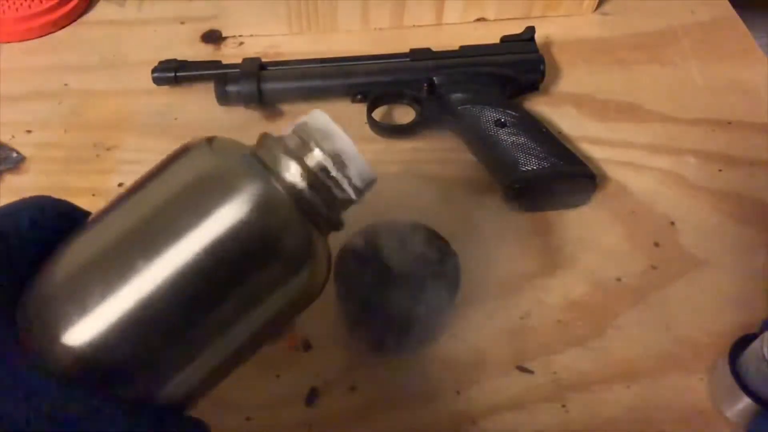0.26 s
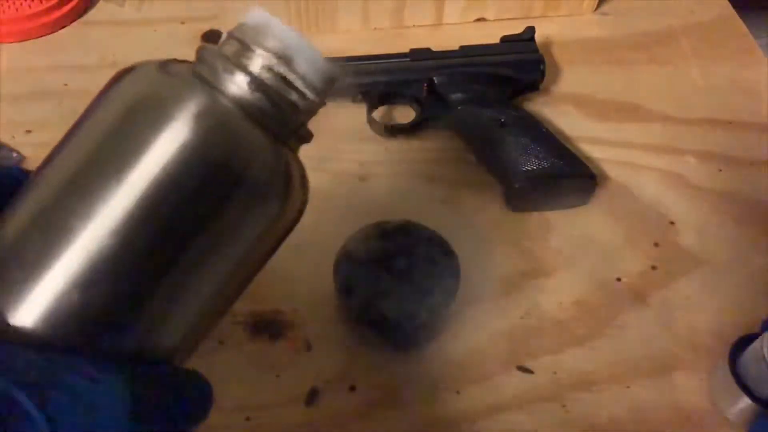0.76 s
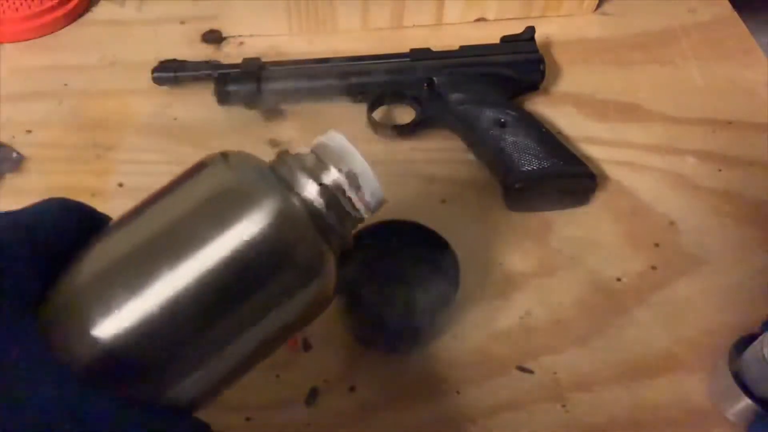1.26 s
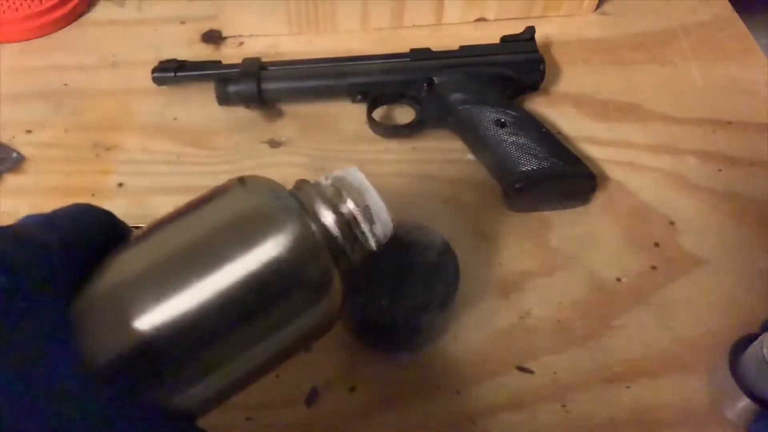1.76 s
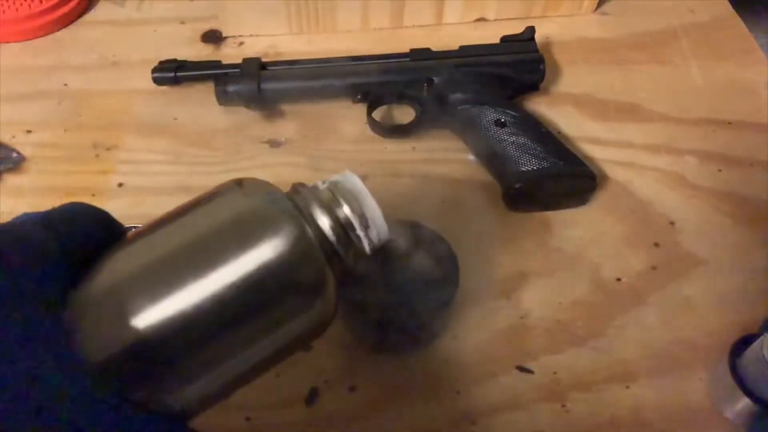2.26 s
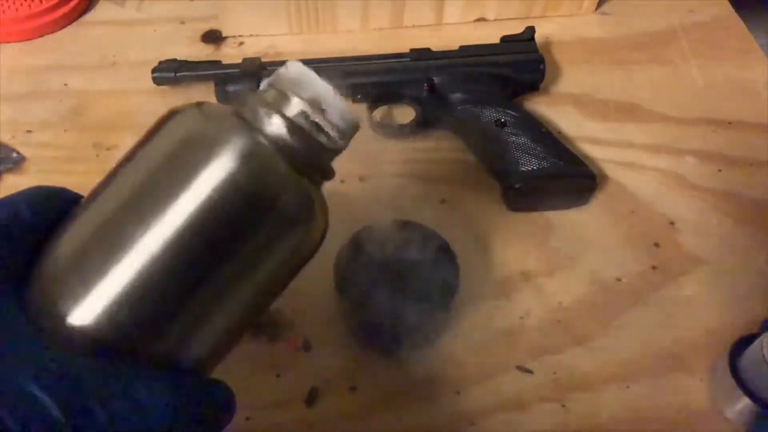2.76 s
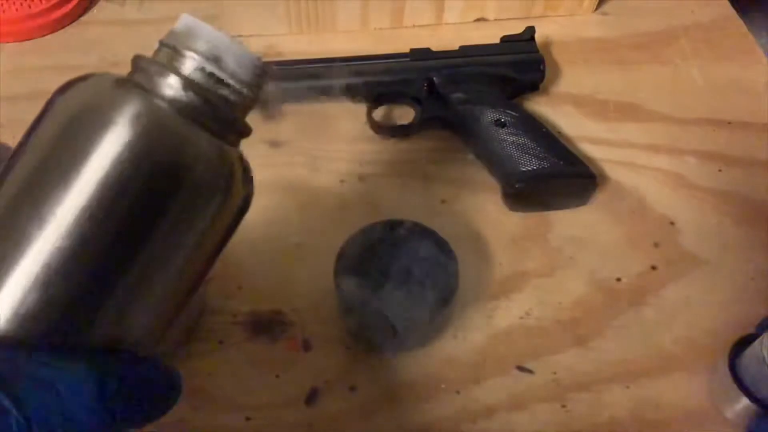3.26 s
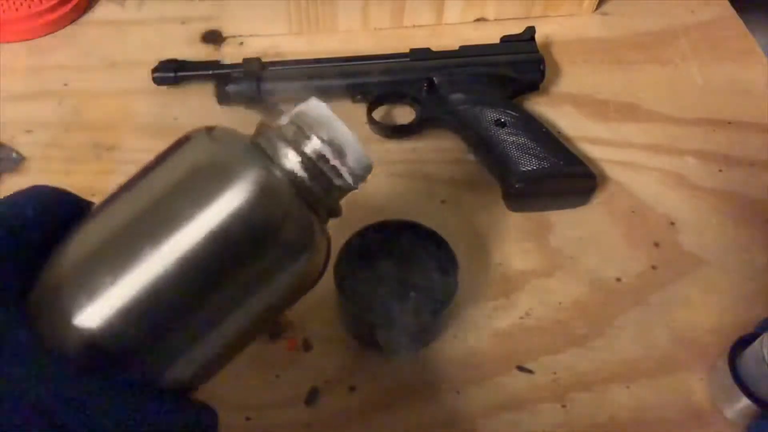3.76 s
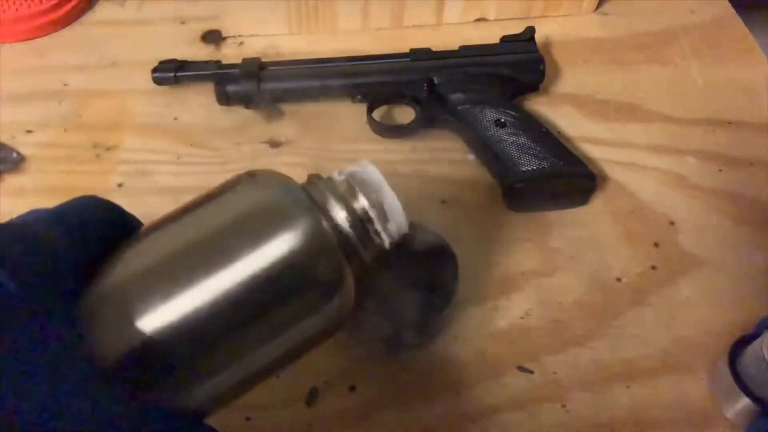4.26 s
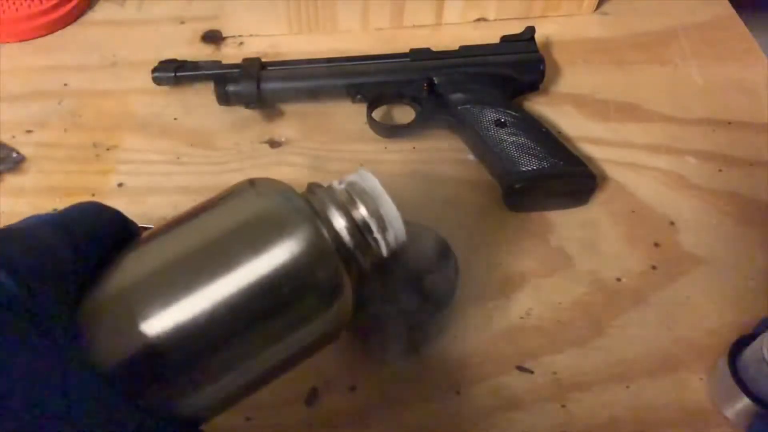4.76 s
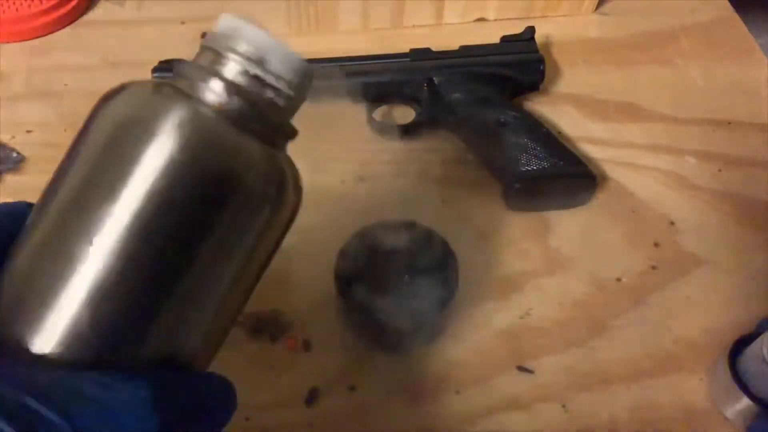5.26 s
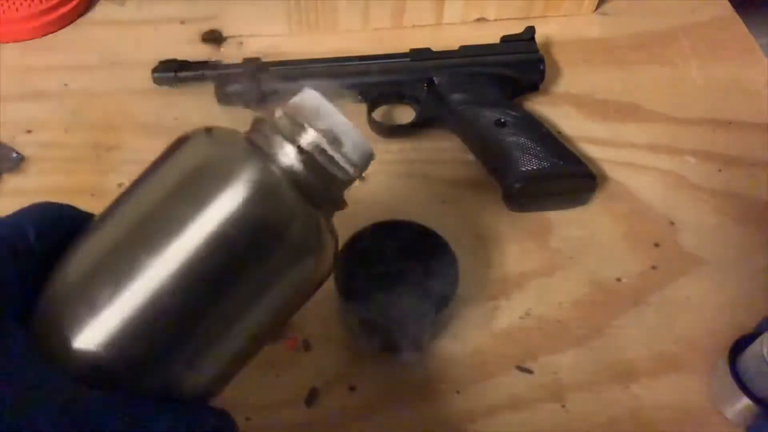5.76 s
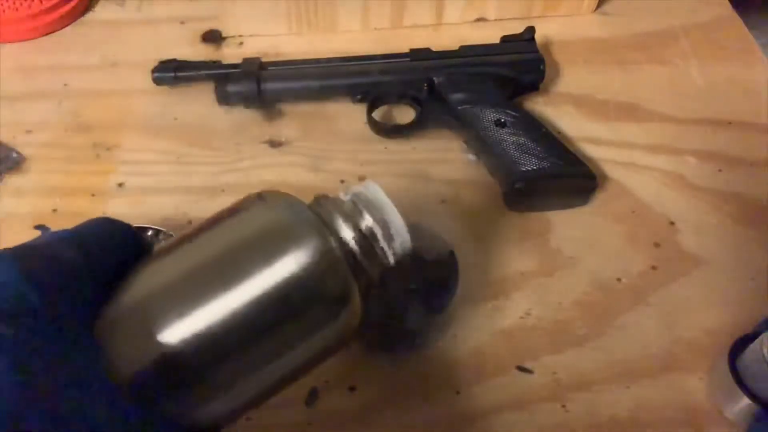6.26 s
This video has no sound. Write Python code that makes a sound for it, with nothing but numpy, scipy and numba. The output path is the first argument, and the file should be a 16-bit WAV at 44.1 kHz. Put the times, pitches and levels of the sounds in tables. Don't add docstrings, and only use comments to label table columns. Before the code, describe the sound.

Liquid nitrogen poured from a metal flask boils on pellets in a small cup, heard very close in a workshop. A dense, bright hiss runs throughout, made of tiny fizzing bursts and wet spatter over hollow bubbling. It strengthens in the first seconds, then stays rough and steady. Around five seconds a sharp crack snaps out. A low motor hum wavers softly behind, picked up in stereo by a handheld phone.

```python
import sys
import numpy as np
from scipy import signal
from scipy.fft import rfft, irfft
from scipy.io import wavfile
from scipy.ndimage import uniform_filter1d
from numba import njit

SR = 44100
rng = np.random.default_rng(int(sys.argv[2]) if len(sys.argv) > 2 else 0)


def store_wav(level_fs):
    pcm = np.round(np.clip(np.atleast_2d(level_fs), -1, 1) * 32767)
    wavfile.write(sys.argv[1], SR, pcm.T.astype(np.int16))


def gain_from_decibels(decibels):
    exponent = np.asarray(decibels, float) / 20
    return 10 ** exponent


N = 287091
HZ = np.fft.rfftfreq(N, 1 / SR)


def unit(x):
    return x / np.sqrt(np.mean(x ** 2))


def along(table):
    hz, *columns = np.transpose(table)
    return [np.interp(np.log(HZ + 1), np.log(hz), c) for c in columns]


def timed(table):
    s, value = np.transpose(table)
    return np.interp(np.arange(N) / SR, s, value)


def swells(table):
    s, half_length, db = np.transpose(table)[:, :, None]
    coarse = np.arange(0, N / SR, 0.002)
    bells = db * np.exp(-((coarse - s) / half_length) ** 2)
    return np.interp(np.arange(N) / SR, coarse, np.sum(bells, axis=0))


def walk(rate):
    k = int(SR / rate)
    held = np.repeat(rng.standard_normal(N // k + 1), k)
    return uniform_filter1d(uniform_filter1d(held, k), k)[:N]


def modes(table):
    total = 0
    for k, (hz, width, db) in enumerate(table):
        damping = 1j * HZ * width
        total = total + (-1) ** k * gain_from_decibels(db) * damping / (hz ** 2 - HZ ** 2 + damping)
    return total


def ringing(pair, body, level_db):
    return unit(irfft(rfft(pair) * body, N)) * gain_from_decibels(level_db)


def ports(spectra, lead, likeness, pan_db):
    alike = np.clip(likeness, 0, 1)
    shared, opposed = spectra * np.sqrt([1 + alike, 1 - alike])
    tilt = gain_from_decibels(pan_db / 2) * np.exp(0.5j * lead)
    return irfft(np.array([(shared + opposed) * tilt, (shared - opposed) / tilt]), N) / np.sqrt(2)


@njit
def chirp(start, pole, glide, size):
    out = np.zeros(N)
    for k in range(len(start)):
        z, p, i = size[k] + 0j, pole[k], start[k]
        while i < N and abs(z) > size[k] / 100:
            out[i] += z.imag
            z, p, i = z * p, p * glide[k], i + 1
    return out


def bubbles(low_hz, high_hz, cycles, rise, spread_db, wash, count):
    crowds = []
    for _ in range(2):
        when, pitch, size = rng.random((count, 3)).T
        step = 2 * np.pi * low_hz * (high_hz / low_hz) ** pitch / SR
        life = cycles * 2 * np.pi / step
        loudness = gain_from_decibels(np.minimum(-spread_db * np.log(1 - size), 9)) * np.sqrt(step)
        start = (when * N).astype(np.int64)
        ring = chirp(start, np.exp(1j * step - 3 / life), np.exp(1j * rise * step / life), loudness)
        crowds.append(unit(ring) + wash * rng.standard_normal(N))
    return np.array(crowds)


# (t/s, level/dB)
BOIL = [(0, -40), (.3, -39.5), (.8, -38), (1.3, -38), (1.8, -37.5), (2.15, -37), (2.45, -37.5), (2.9, -36),
        (3.5, -36), (4, -36.5), (4.4, -36.5), (4.85, -37), (5.1, -36), (5.5, -36), (5.9, -37),
        (6.51, -37.5)]
# (t/s, depth 0-1)
POOL_DEPTH = [(0, 0), (.9, 0.08), (1.5, 0.36), (2.6, 0.26), (3.2, 0.29), (3.8, 0.45), (4.2, 0.84),
              (5.2, 0.71), (5.8, 0.91), (6.51, 1)]
# (t/s, half length/s, level/dB)
BOIL_SPURTS = [(0.02, 0.009, 0.5), (0.423, 0.022, 1.5), (1.002, 0.021, -0.5), (1.925, 0.026, -0.5),
               (2.118, 0.027, 0.5), (2.215, 0.026, 1.0), (2.438, 0.021, -1.2), (2.83, 0.036, 1),
               (3.023, 0.028, 0.2), (4.443, 0.019, 1), (4.778, 0.019, -1), (5.103, 0.011, 2),
               (5.296, 0.044, 0.5), (5.57, 0.029, 0.8), (6.128, 0.031, -1.8), (6.196, 0.02, 0.9),
               (6.261, 0.016, 0.5), (6.317, 0.022, -0.5), (6.455, 0.024, 1.5)]


def follows(full_db, per_db, deep_db, half_db):
    full_boil_db = -35
    depth = timed(POOL_DEPTH)
    half_full = 1 - (2 * depth - 1) ** 2
    boil_db = per_db * (timed(BOIL) - full_boil_db) + swells(BOIL_SPURTS)
    return full_db + boil_db + deep_db * depth + half_db * half_full


# (f/Hz, width/Hz, level/dB)
DEEP_AIR = [(662, 114, -1), (901, 137, 3.5), (1260, 420, -6.5)]
# (t/s, level/dB)
GURGLING = [(0, -1), (.7, -0.5), (1.1, 0.5), (1.6, 0.5), (2.2, 0), (2.8, 0), (3.4, -0.5), (3.9, -1),
            (4.4, 0), (5, 0), (5.6, 0.5), (6.1, 0.5), (6.51, 1.5)]


def gurgle(big, surge):
    flicker_db = 0.4 * surge + 0.15 * walk(25)
    return ringing(big, modes(DEEP_AIR), follows(-49.5, 0.27, 7.5, -0.2) + timed(GURGLING) + flicker_db)


# (f/Hz, width/Hz, level/dB)
HIGH_AIR = [(1732, 315, -4), (1989, 103, -1), (2328, 310, -4), (2810, 100, -1)]


def cup_ring(big, surge):
    flicker_db = 0.12 * surge + walk(22.94)
    return ringing(big, modes(HIGH_AIR), follows(-44, 1.28, 4.5, 1.05) + 1.43 + flicker_db)


# (f/Hz, width/Hz, level/dB)
SPATTER_AIR = [(3140, 680, -5), (4360, 1240, -1), (5420, 2080, -4)]
# (t/s, half length/s, level/dB)
NECK_SHADES = [
    (1.45, 0.07, -2.5),
    (4.6, 0.25, -1.5),
    (4.95, .08, -1),
    (5.1, 0.033, -3),
    (6.2, 0.13, -2),
    (6.45, 0.089, -2),
]


def spatter(small, surge):
    flicker_db = 0.23 * surge + 0.61 * walk(14)
    level_db = follows(-35, 1.56, -0.4, 0.5) + 0.59 + swells(NECK_SHADES)
    return ringing(small, modes(SPATTER_AIR), level_db + flicker_db)


# (f/Hz, width/Hz, level/dB)
BENCH_TOP = [(172.4, 43, -0.5), (249.4, 39, -1.5), (326, 33, 0.5), (509, 80, -5)]
# (t/s, level/dB)
BENCH_SHAKE = [(0, 1), (.5, -0.5), (.95, 1.5), (1.4, -0.5), (1.8, -0.5), (2.3, 2), (2.9, 1), (3.5, 1.5),
               (4, 1.5), (4.5, -0.5), (4.9, -0.5), (5.2, 0.5), (5.6, -0.5), (5.95, 2.5), (6.2, 0.5),
               (6.51, -0.5)]


def bench_rumble(surge):
    flicker_db = 1.4 * surge + 1.5 * walk(5.5)
    level_db = follows(-60.5, 0.38, 9, 0.15) + timed(BENCH_SHAKE)
    return ringing(rng.standard_normal((2, N)), modes(BENCH_TOP), level_db + flicker_db)


# (t/s, level/dB)
RIM_SPRAY = [(0, -4), (.7, -1.5), (1.1, 4.5), (2, 6), (2.4, 1), (2.8, 0), (3.3, 1), (3.6, -2), (4.2, 0),
             (5.03, 2), (5.1, -9), (5.17, 1), (5.5, 5), (6.51, -2)]


def bare_rim(small):
    level_db = follows(-46.5, -0.5, -3, -3) + timed(RIM_SPRAY) + 0.71 * walk(3.2)
    other_bursts = np.roll(small, N // 3, axis=1)
    return ringing(other_bursts, modes([(3390, 450, 0)]), level_db)


# (f/Hz, left leads/radians, likeness 0-1, left minus right level/dB)
CUP_PATHS = [(150, 0, 1, -0.5), (400, 0, .97, -0.5), (900, 0.25, 0.96, 0), (1250, 0.16, 0.93, 1.5),
             (1550, 0.2, .98, 0.5), (1730, 0.73, 0.95, -3.5), (2100, 1, 0.4, -2), (2320, 1.5, 0.4, -0.5),
             (2460, 2.5, 0.46, -3.5), (2940, 3.5, 0.13, -3), (2920, 4.5, 0.8, -0.5), (3190, 3.5, 0.37, 3.5),
             (3520, 1.5, 1, -3.5), (4150, 3, 0.54, -4), (4600, 4, 0.57, -3.5), (5200, 3.5, 0.47, -1),
             (5600, 3.5, .65, -6), (6240, 4, 0.7, -9.5)]
# (t/s, share 0-1)
GATHERING = [(0, .7), (.3, 1), (.47, .5), (.65, 0.9), (1.2, 0.6), (1.45, .3), (1.9, 0.55), (2.3, 0.35),
             (2.75, .5), (3, .5), (3.2, 0.3), (3.7, 0.6), (4.05, .5), (4.2, .2), (4.75, 0.5), (4.95, .4),
             (5.1, 0.8), (5.33, 0.7), (5.45, 0.55), (5.95, 0.6), (6.15, 0.3), (6.51, 0)]


def gathered(pair):
    lead, likeness, pan_db = along(CUP_PATHS)
    reach = np.clip(np.minimum(HZ - 2400, 3230 - HZ) / 150, 0, 1)
    pull = 0.85 * reach
    scattered = ports(pair, lead, likeness, pan_db)
    tight = ports(pair, lead + pull * (np.pi - lead), likeness + pull * (1 - likeness), pan_db * (1 - pull))
    return scattered + np.clip(timed(GATHERING), 0, 1) * (tight - scattered)


def cup():
    surge = walk(14)
    big = bubbles(463, 2775, cycles=5.35, rise=0.15, spread_db=1.13, wash=0.63, count=12000)
    small = bubbles(2160, 7530, cycles=3.35, rise=0.17, spread_db=4.0, wash=0.86, count=30000)
    boil = gurgle(big, surge) + cup_ring(big, surge) + spatter(small, surge)
    body = bench_rumble(surge) + bare_rim(small) + cup_mouth(big, surge)
    return gathered(rfft(boil + body))


# (f/Hz, left leads/radians, likeness 0-1, left minus right level/dB)
FIZZ_PATHS = [(6200, -2.6, 0, -4.5), (7000, -2.2, .45, -1), (7750, -1.4, .6, .3), (8200, -2.1, .6, -.3),
              (8700, -3.14, .74, -1), (10190, -6.28, .68, 0), (11200, -8.17, .66, 0),
              (11790, -9.42, .66, 0), (13420, -12.57, .66, 0), (14250, -14.1, .66, 0),
              (14900, -15.71, .66, 0), (15900, -17.18, .66, 0)]


def stepwise_paths(pair, lean_us):
    lead, likeness, pan_db = along(FIZZ_PATHS)
    lock = np.clip((HZ - 8600) / 1900, 0, 1)
    lead = lead - 2 * np.pi * HZ * lean_us / 1e6
    lead = lead - 0.39 * lock * np.sin(2 * lead)
    unlike = (1 - likeness) * (1 - lock * np.cos(lead) ** 2)
    return ports(pair, lead, 1 - unlike, pan_db)


# (t/s, delay/microseconds)
PHONE_LEAN = [(0, -.5), (.4, -1), (1.1, -1.8), (1.6, 0.23), (1.9, .4), (2.1, -.8), (2.5, .2), (3, -.8),
              (3.4, 0.46), (3.7, -.5), (4, .1), (4.6, .7), (4.95, 0.44), (5.1, -1.1), (5.3, .4),
              (5.55, -1.4), (6, -1.4), (6.3, -.5), (6.51, -1.6)]


def leaning(spectra):
    back, forward = stepwise_paths(spectra, -2), stepwise_paths(spectra, 2)
    lean_us = timed(PHONE_LEAN) + 0.74 * walk(15)
    return back + (lean_us + 2) / 4 * (forward - back)


# (f/Hz, level/dB per Hz)
FIZZ_TONE = [(2500, -24), (5000, -13), (6300, -2.5), (7200, 0), (8400, 2.5), (10000, 0), (11700, -0.9),
             (13200, -0.5), (14200, -1), (15000, -1.5), (16000, -3)]


def fizz():
    bright_db = -0.8 + 4.5 * timed(POOL_DEPTH)
    uneven_db = 1.9 * rng.standard_normal(N) + 0.5 * walk(300)
    clicks = rfft(rng.standard_normal((2, N)) * gain_from_decibels(uneven_db)) * gain_from_decibels(along(FIZZ_TONE)[0])
    octave = np.clip(np.log2((HZ + 1) / 6000), 0, 1.2)
    heard = 0
    for centre in np.arange(4) * 0.4:
        share = np.clip(1 - abs(octave - centre) / 0.4, 0, 1)
        seethe_db = 0.23 * walk(13) + 0.2 * walk(25.16) + 1.4 * walk(150)
        heard = heard + irfft(clicks * share, N) * gain_from_decibels(bright_db * centre + seethe_db)
    level_db = follows(-32.5, 0.85, 0.2, 1) + 5 + 0.39 * walk(11)
    return leaning(rfft(unit(heard) * gain_from_decibels(level_db) + ticks()))


# (multiple of its turning rate, level/dB rms)
MOTOR_HUM = [
    (1, -45),
    (2, -63),
    (5.9, -76.5),
]


def motor():
    turn = 2 * np.pi * np.cumsum(55.6 + 0.23 * walk(2.78)) / SR
    hum = 0
    for k, db in MOTOR_HUM:
        waver_db = (0.5 + 0.5 * k) * walk(7)
        hum = hum + np.sqrt(2) * gain_from_decibels(db + waver_db) * np.sin(k * turn)
    throb = 1 + 0.16 * np.sin(2 * np.pi * 8.1 * np.arange(N) / SR)
    side = gain_from_decibels(np.array([[0.5], [-0.5]]) * -3.5)
    return hum * throb * side


# (f/Hz, level/dB per Hz)
ROOM_TONE = [(20, -27), (40, -12), (50, 4), (70, 1.5), (110, 0.5), (150, -5), (300, -27), (600, -13),
             (2000, -8), (16000, -21.5)]
# (f/Hz, left leads/radians, likeness 0-1, left minus right level/dB)
ROOM_PATHS = [(60, 0, .99, -3), (200, 0, .98, -.4), (2000, 0, .8, 0)]


def room_air():
    noise = rfft(rng.standard_normal((2, N)))
    air = unit(irfft(noise * gain_from_decibels(along(ROOM_TONE)[0]), N)) * gain_from_decibels(-51)
    return ports(rfft(air), *along(ROOM_PATHS))


# (f/Hz, width/Hz, level/dB)
MOUTH_AIR = [
    (1400, 160, -7.5),
    (1724, 220, 2),
]


def cup_mouth(big, surge):
    since = np.arange(N) / SR - 2.9
    level_db = -44.5 - 2 * since + 0.4 * surge
    covered = 1 / (1 + np.exp(-since / 0.13))
    return ringing(np.roll(big, N // 2, axis=1), modes(MOUTH_AIR), level_db) * covered


# (t/s, level/dB)
PELLET_CRACKS = [
    (5.1102, -16),
    (5.8, -23),
    (4.7435, -23),
]


def ticks():
    out, after = np.zeros((2, N)), np.arange(SR // 50) / SR
    for s, db in PELLET_CRACKS:
        i = int(s * SR)
        decay = gain_from_decibels(db - 60 * after / 0.013)
        out[:, i:i + len(after)] += decay * rng.standard_normal((2, len(after)))
    return irfft(rfft(out) * modes([(9500, 5300, 0)]), N)


def scene():
    return cup() + fizz() + motor() + room_air()


def top_cut(x):
    return signal.sosfilt(signal.butter(12, 15730, fs=SR, output="sos"), x)


def record(dry):
    return top_cut(dry)


dry = scene()
out = record(dry)
store_wav(out)
```